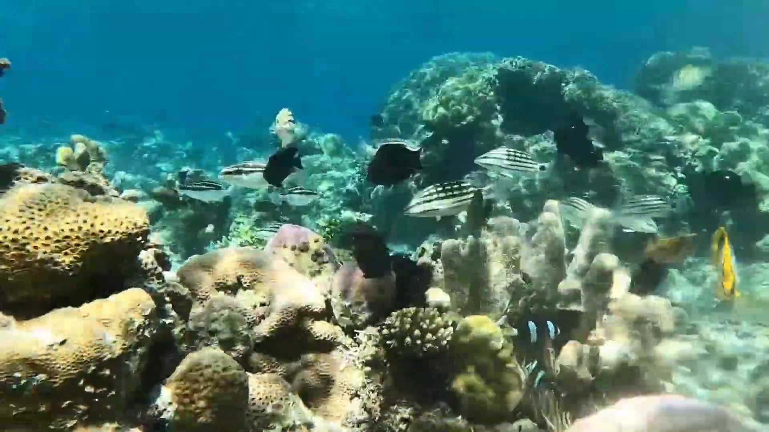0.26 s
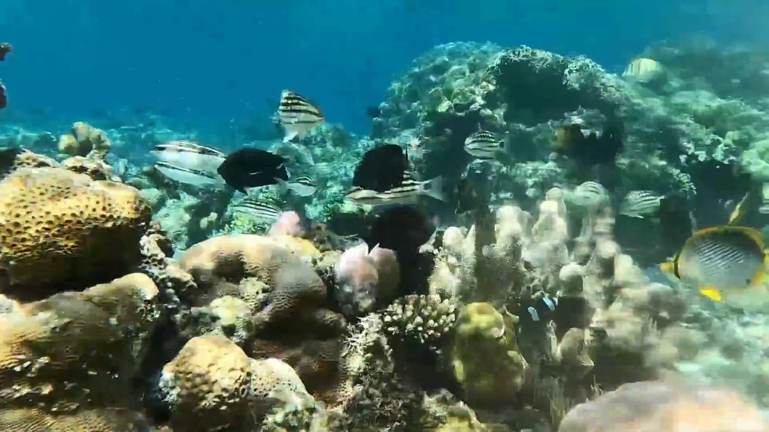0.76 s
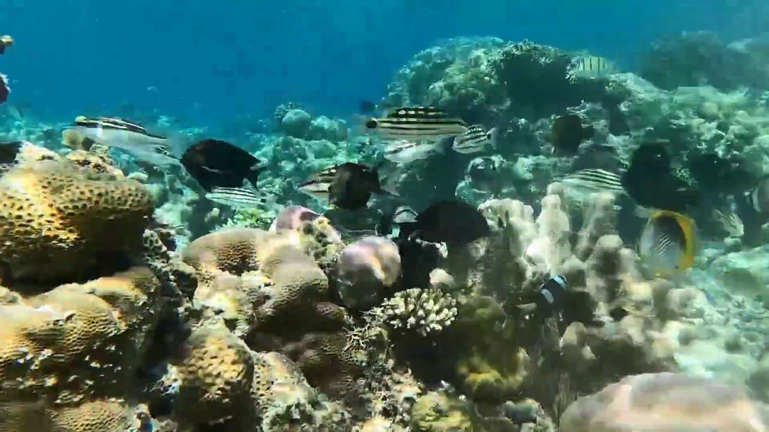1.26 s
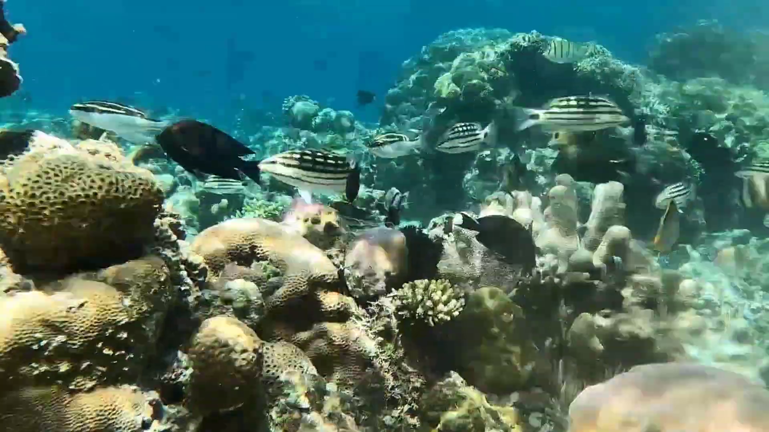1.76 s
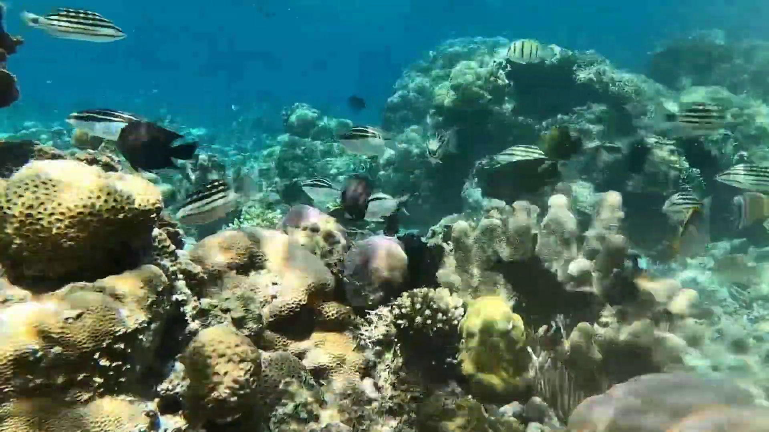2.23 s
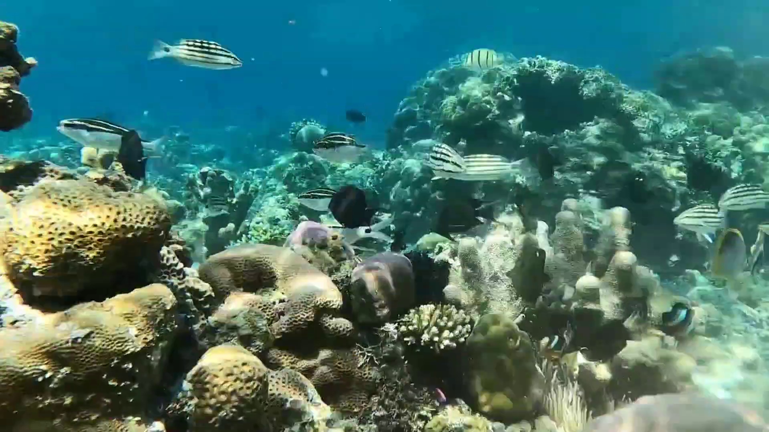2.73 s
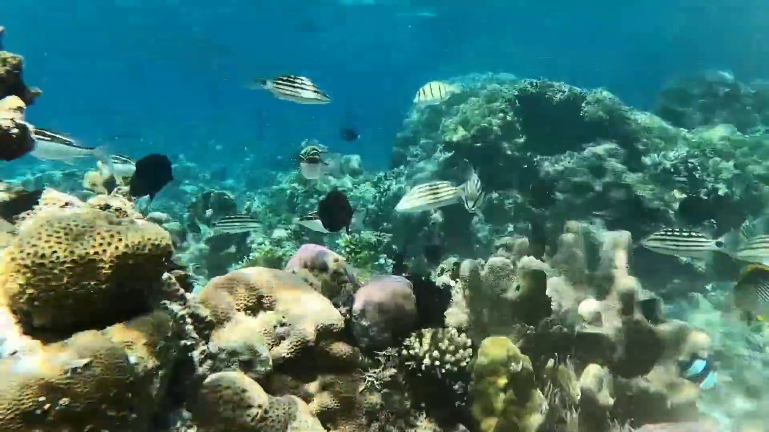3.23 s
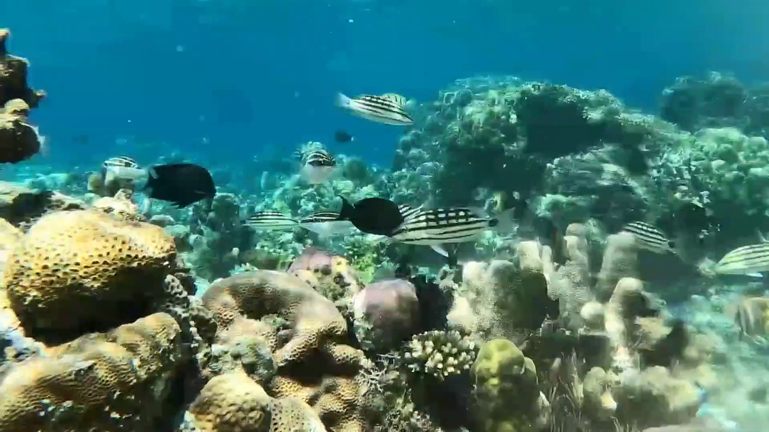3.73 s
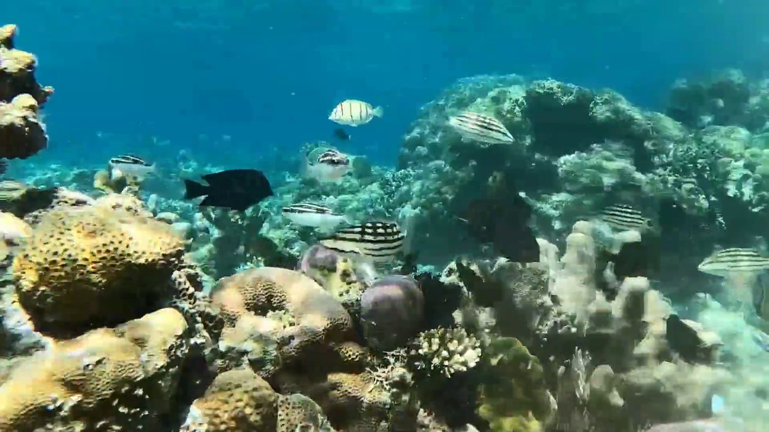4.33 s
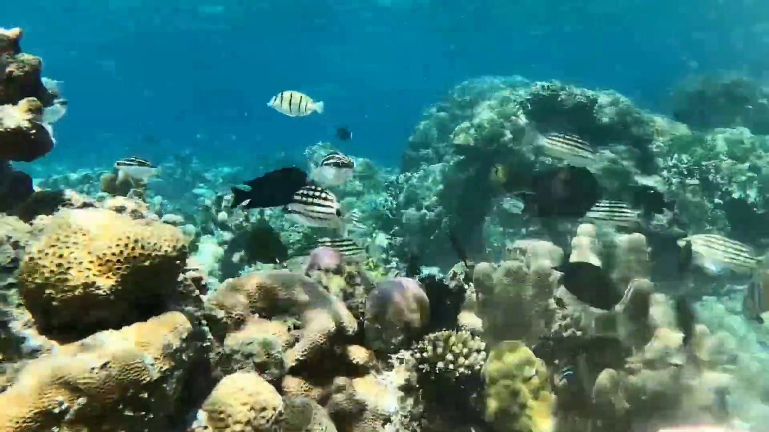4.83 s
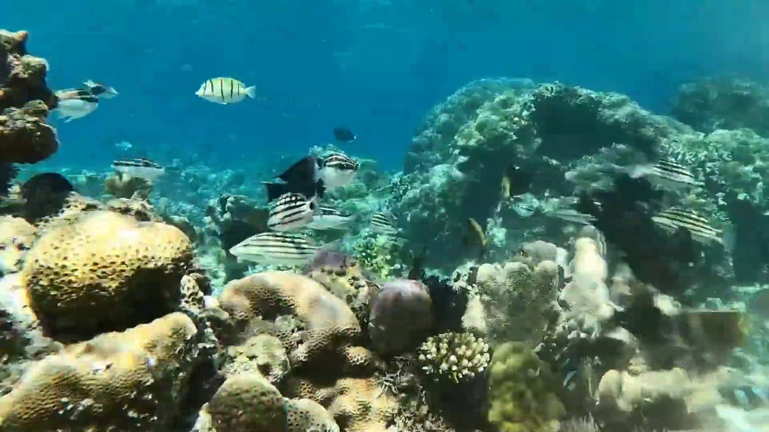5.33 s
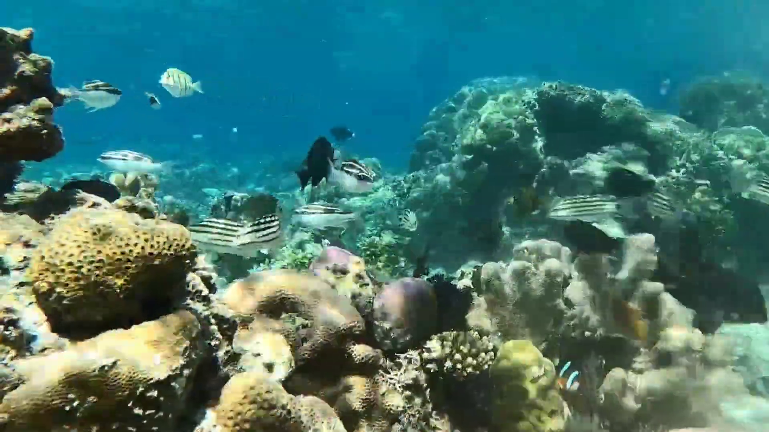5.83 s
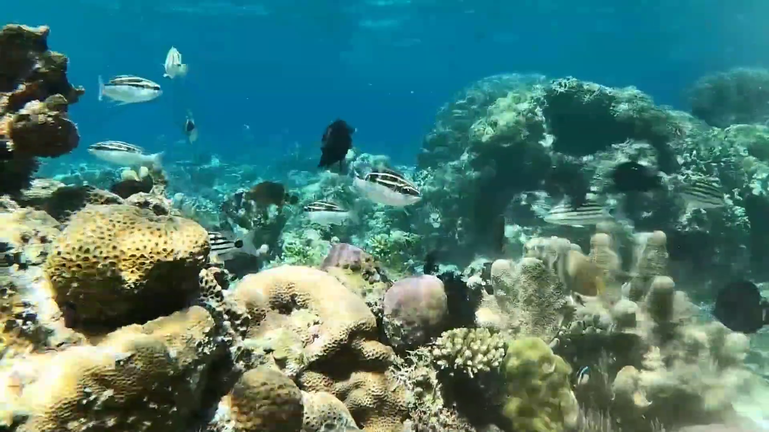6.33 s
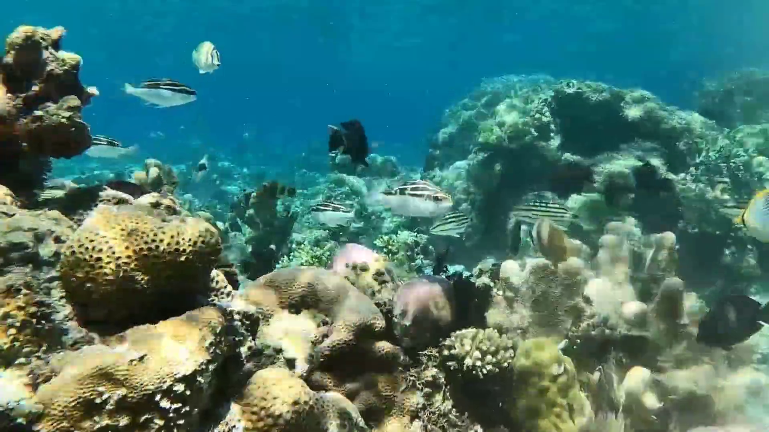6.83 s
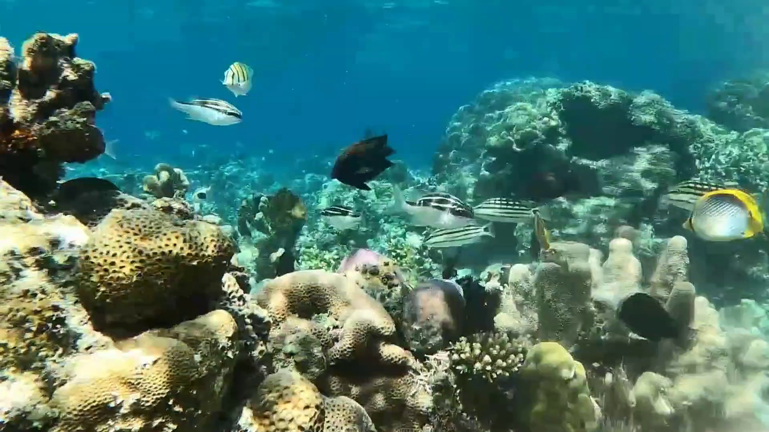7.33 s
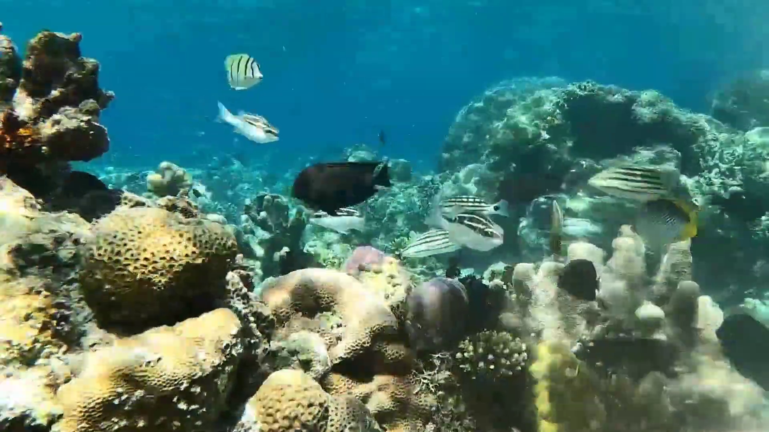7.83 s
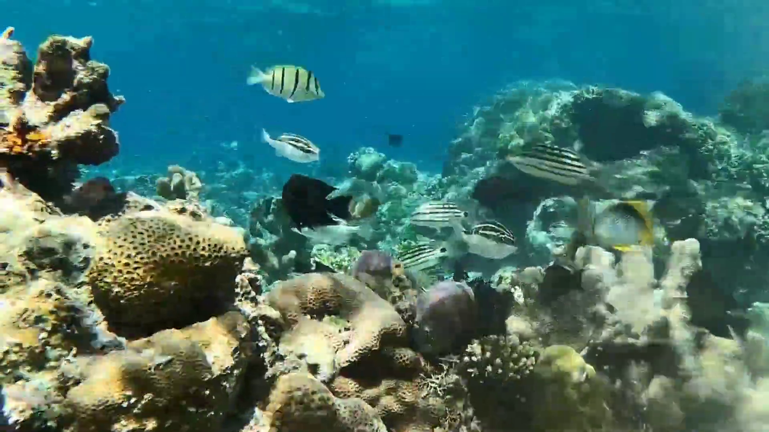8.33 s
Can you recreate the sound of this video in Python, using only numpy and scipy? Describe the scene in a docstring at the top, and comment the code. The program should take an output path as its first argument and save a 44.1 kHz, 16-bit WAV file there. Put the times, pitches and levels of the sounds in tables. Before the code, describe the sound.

A close, muffled underwater soundscape on a coral reef, heard in stereo through a sealed camera housing. From the start, distant snapping shrimp form a continuous fine fizz like frying, while nearer ones make irregular dry clicks and pops that ring the housing briefly; a strong snap comes near 0.5 s. Soft, low fish knocks appear here and there throughout. Around 0.9-1.4 s the housing is lightly bumped and rubbed as the water rumble rises. Loud snaps hit near 2.0-2.3 s, then a heavier surge with dull thuds and grainy rubbing runs from 2.4 to 3.1 s, followed by scattered bumps until 3.9 s. A loud pop lands at 4.6 s. From 5 to 6.7 s it is calmer, with crackle, low rumble and isolated knocks. Snaps thicken after 6.7 s, strong at 7.4 and 8.1 s, with a brief buffet near 7.55 s. Bumps, rubbing and a surge swell at 8.4-8.6 s. Faint hiss lies beneath.

```python
"""Snapping shrimp crackle near and far over a coral reef, around a camera in a sealed housing.
Their clicks are noise and impulses that ring the housing's modes; fish knock softly with sagging tones.
The surge rumbles and buffets as coloured noise, and bumps and rubbing ring the housing wall.
A faint microphone hiss lies underneath."""
import sys
import numpy as np
from scipy import signal
from scipy.fft import rfft, irfft, next_fast_len
from scipy.io import wavfile
from scipy.ndimage import uniform_filter1d

SR = 44100
rng = np.random.default_rng(int(sys.argv[2]) if len(sys.argv) > 2 else 0)


def wrap_up_sound(samples):
    """Save the sound to the file named by the first command line argument, as 16-bit audio."""
    columns = np.atleast_2d(samples).T
    # keep every value between -1 and 1, then stretch to whole-number steps
    tamed = np.clip(columns, -1, 1)
    steps = np.round(tamed * 32767).astype(np.int16)
    wavfile.write(sys.argv[1], SR, steps)


N = 378378


def gain_of(db):
    """Decibels to amplitude."""
    return 10 ** (np.asarray(db) / 20)


def evened(x):
    """Scales to rms 1."""
    return x / np.sqrt(np.mean(abs(x) ** 2) + 1e-20)


def curve(rows, **ends):
    """A level table against time, at every sample."""
    return np.interp(np.arange(N) / SR, *np.transpose(rows), **ends)


def lumps(seconds):
    """Slow random wander of rms 1: noise averaged twice over the given time."""
    size = max(int(seconds * SR), 2)
    once = uniform_filter1d(rng.standard_normal(N), size)
    return evened(uniform_filter1d(once, size))


def alike(a, b, same):
    """Blends two independent noises so that the result resembles the first by the given likeness."""
    return same * a + np.sqrt(1 - same ** 2) * b


def coloured(spectrum, likeness):
    """Two channels of noise with a given spectrum and left-right likeness, rms 1."""
    size = next_fast_len(N)
    pitch = np.log(np.fft.rfftfreq(size, 1 / SR) + 1)
    hz, db = np.transpose(spectrum)
    same_hz, same = np.transpose(likeness)
    same = np.clip(np.interp(pitch, np.log(same_hz + 1), same), 0, 1)
    shape = gain_of(np.interp(pitch, np.log(hz + 1), db, left=-90, right=-90))
    left, other = rfft(rng.standard_normal((2, size))) * shape
    return evened(irfft([left, alike(left, other, same)], size)[:, :N])


def ring(x, hz, width):
    """Three like poles in a row: a click swells for a moment, then dies; unit energy, complex out."""
    r = np.exp(-np.pi * width / np.sqrt(np.cbrt(2) - 1) / SR)
    pole = r * np.exp(2j * np.pi * hz / SR)
    energy = (1 + 4 * r ** 2 + r ** 4) / (1 - r ** 2) ** 5
    return signal.lfilter([1], np.poly([pole, pole, pole]), x) / np.sqrt(energy)


def add(mix, s, sound):
    """Mixes a sound in at a time in seconds."""
    part = mix[max(round(s * SR), 0):][:len(sound)]
    part += sound[:len(part)]


# Near shrimp. Each row: snap time in seconds, relative strength in dB, centre pitch in Hz, # change away from
# that pitch in dB per octave.
SNAPS = [(0.142, -29, 1490, 2), (0.2097, -21, 2960, -8), (0.2283, -19, 3590, -2.5),
         (0.2405, -14, 7150, -18), (0.3217, -24, 3260, -5), (0.3533, -22, 6450, -4.5),
         (0.3783, -16.5, 1490, -9), (0.4031, -22, 6450, -8), (0.4458, -20, 1490, 0.5),
         (0.4887, 3.5, 5100, -3), (0.5011, -32, 4380, -5), (0.5622, -14.0, 7700, -21.0),
         (0.584, -26, 3420, -10), (0.6541, -19, 10000, -4.5), (0.7489, -13.5, 1930, -11),
         (0.8993, -6, 2220, -1.0), (0.9256, -8, 2550, -27), (0.9462, -16, 1490, -5.5),
         (0.9735, -23.5, 6400, -6), (1.0119, -25, 2820, 1.5), (1.028, -22, 6400, -11),
         (1.0568, -23, 10000, -2), (1.1566, -25, 3420, -2), (1.501, -21.5, 6770, -6.0),
         (1.5193, -19.5, 2820, -4.5), (1.5443, -10.5, 5800, -6.5), (1.6306, -3.5, 2760, -14.5),
         (1.715, -3.5, 2365, -42), (1.7781, -14, 2040, -10.5), (1.8313, -8, 10000, -9),
         (1.8727, -19, 10000, -4), (1.888, -10, 6470, -5), (2.0291, 0.5, 8930, -1.5),
         (2.0426, -28, 1650, -4.0), (2.1572, -17.5, 6400, -4.5), (2.168, -8, 7460, -3.5),
         (2.2083, -13.5, 1490, -7.5), (2.2292, 7, 1490, -38), (2.244, -25, 10000, -2),
         (2.2619, 2, 9070, -16.0), (2.3971, -14, 1490, -9.0), (2.4107, -25.5, 10000, 1),
         (2.5114, -17, 1490, -25.0), (2.5245, -18.5, 1570, -29.0), (2.5422, -19, 1570, -26.0),
         (2.5818, -17.5, 8640, -8), (2.6335, -27.5, 1650, -3), (2.6894, -22, 1490, -5),
         (2.8152, -19, 4370, -7), (2.8451, -16, 2820, -4), (2.8854, -18.5, 1490, -13),
         (2.8977, -20, 1490, -11), (2.9383, -24.5, 1490, -9), (2.9631, -10, 3280, -9),
         (3.1316, -11.5, 1880, -17), (3.2625, -6.5, 7550, -29), (3.3702, -12, 9070, -10),
         (3.4462, -17.5, 1490, -4), (3.4973, -12, 10040, -6.5), (3.5215, -14, 1708, -5.5),
         (3.6066, -8, 10000, -16), (3.619, -14.5, 10000, -1.5), (3.6855, -15.5, 9080, -8),
         (3.742, -12, 4030, -11), (3.9082, -25, 1493, -27), (3.9337, -16, 1720, -22),
         (4.0019, -15.0, 7460, -5.5), (4.017, -17, 5050, -10), (4.0315, -15.5, 2210, -5),
         (4.042, -11.5, 3520, -21), (4.08, -23.5, 1740, 1), (4.104, -16.5, 1490, -2.0),
         (4.1235, -23.0, 2670, -12), (4.1787, -5.5, 3480, -13.5), (4.271, -19.5, 9000, -11),
         (4.3307, -12.5, 7400, -17), (4.3799, -9, 7370, -4.0), (4.4513, -6.5, 9700, -13),
         (4.485, -8.0, 7110, -9.5), (4.4965, -10.5, 6132, -9.5), (4.5546, -25.5, 2960, -7),
         (4.569, -22, 5050, -5), (4.5803, 4.5, 1560, -10.5), (4.6843, -16, 1730, -6.5),
         (4.749, -19, 7050, -8.0), (4.7923, -15, 2210, -12), (4.875, -22.5, 6400, -5),
         (4.893, -20, 6800, -12), (4.939, -14.5, 1490, -8), (4.9934, -9, 8100, -14),
         (5.003, -24, 6780, -2.5), (5.0225, -18, 5310, -4), (5.1313, -15.5, 8640, -7.5),
         (5.1745, -25, 8640, -4.5), (5.1882, -19, 4810, -10), (5.2913, -21, 1820, -7.5),
         (5.3299, -13.5, 4640, -14), (5.3947, -17.5, 1490, -0.5), (5.58, -20, 7460, -7.5),
         (5.6309, -16, 3590, -2.5), (5.7114, -12.5, 2960, -6), (5.812, -17, 1490, -26),
         (5.8766, -18, 8230, -12), (5.953, -29.5, 10000, 2.5), (6.0304, -14, 10000, -2),
         (6.0439, -17, 1490, -3.5), (6.1476, -16, 7200, -8.5), (6.21, -20, 1649, -9),
         (6.315, -23, 10000, -2.0), (6.3949, -11, 2550, -31), (6.6618, -24, 1495, -0.0),
         (6.7018, -16, 4810, -5.5), (6.7565, -13.5, 6500, -11), (6.767, -4.5, 3210, -5),
         (6.7784, -24, 1729, -6), (6.8202, -18.5, 5310, -7), (6.8407, -22.5, 2210, -5),
         (6.9946, -13.5, 2000, -9.5), (7.0298, -6, 1820, -10), (7.0426, -16, 1490, -9),
         (7.0533, -17, 10000, -5.5), (7.0716, -17, 1570, -20.0), (7.1165, -18, 2430, -22),
         (7.134, -18, 3260, -4.5), (7.1614, -22.5, 1730, -2.5), (7.215, -18, 5500, -7),
         (7.2205, -11.0, 10000, -5), (7.2385, -3, 2470, -32), (7.283, -21, 2210, -5.5),
         (7.321, -23, 2960, -2), (7.3482, -18, 3980, -5.5), (7.413, 0.5, 9070, -9),
         (7.4354, -9.5, 7460, -9), (7.4481, -14, 1500, -4), (7.4765, -23, 2960, -4),
         (7.5189, -18.0, 7460, -5.5), (7.5904, -24.5, 6450, -4), (7.6468, -8.5, 3103, -11),
         (7.6628, -18.5, 3260, -12), (7.7742, -13, 9520, -10), (7.7977, -18, 7840, -5.5),
         (7.851, -15, 1560, -32), (7.8682, -16.0, 10000, -6.5), (7.946, -19.5, 1730, -8.0),
         (7.9665, -16.5, 9070, -9.5), (7.984, -14.5, 10000, -12), (8.0077, -18.5, 7460, -6.5),
         (8.0346, -9.5, 1730, -4), (8.0723, -9.5, 9520, -6.0), (8.1363, 6.0, 9520, -10.0),
         (8.1523, -19.0, 2430, -22.0), (8.2132, -27, 9070, 0.5), (8.3005, -19, 3830, -13),
         (8.364, -18.5, 4160, -6), (8.4161, -5, 7800, -26), (8.434, -19, 7997, -10),
         (8.4472, -6.5, 4584, -7.5), (8.5075, -4, 1560, -29.0), (8.5328, -25, 1490, 1)]
# Typical colour of near shrimp: one relative level in dB for each of the four snap bands.
NEAR_DB = [-7.5, -3.5, -4.6, -16.5]
SKIRT_DB = -23.5  # far from its pitch a snap falls no lower than this


def near_snaps(heard_hz, bands, bounce):
    """Near-shrimp impulses, one train per given frequency; each snap has its own pitch and surface echo."""
    s, db, hz, fall_db = np.transpose(SNAPS)
    octaves_away = abs(np.log2(np.c_[heard_hz] / hz))
    tint_db = np.maximum(fall_db * octaves_away, SKIRT_DB)
    size = gain_of(db + np.c_[NEAR_DB][bands] + tint_db)
    # each snap returns once off the water surface, 0.9 to 3.5 ms later and 12 to 4 dB softer
    late_s = np.interp(bounce[0], [0, 1], (.0009, .0035))
    late_db = np.interp(bounce[1], [0, 1], (-12, -4))
    trains = np.zeros((len(bands), N))
    trains[:, np.round((s + late_s) * SR).astype(int)] = size * gain_of(late_db)
    trains[:, np.round(s * SR).astype(int)] = size
    return trains


# Typical colour of small shrimp: one relative level in dB for each of the four snap bands.
SMALL_DB = [-6.5, -2.5, -0.5, -7]


def crackle(per_s=190, level_db=-51, spread_db=5, cap=2.57, colour_db=6):
    """Many smaller shrimp: random moments, few large, each with its own colour."""
    size_db = level_db + spread_db * np.minimum(rng.exponential(1, N), cap)
    tint_db = np.array(SMALL_DB)[:, None] + colour_db * rng.standard_normal((4, N))
    snaps_now = rng.random(N) < per_s / SR
    return snaps_now * gain_of(size_db + tint_db)


def scatter(trains, t60, rise):
    """Envelope of the echoes from coral and surface: they gather for a moment, then fade."""
    fall = gain_of(-120 / t60 / SR)  # acts on power: 60 dB down after t60 seconds
    grow = np.exp(-1 / (max(rise, 1e-4) * SR))
    power = signal.lfilter([1 - grow], np.poly([fall, grow]), trains ** 2)
    return np.sqrt(abs(power))


# Far shrimp merged into a fizz. Each row: time in seconds, relative level in dB.
FIZZ = [(0.0, -64.5), (0.14, -57), (0.33, -57), (0.62, -59.5), (2.34, -57.5), (2.75, -56.5), (3.13, -59.5),
        (4.8, -57), (5.07, -58), (7.05, -58), (7.24, -56.5), (7.55, -58.5), (8.46, -57.5), (8.58, -56.5)]
# Typical colour of far shrimp: one relative level in dB for each of the four snap bands.
FAR_DB = [-7, -5, -3, -20]


def fizz():
    """Level of the merged far snaps in each band, flickering together and band by band."""
    own_flicker = np.array([lumps(0.0068) for _ in FAR_DB])
    return gain_of(curve(FIZZ) + np.array(FAR_DB)[:, None] + 1.88 * lumps(0.016) + 2.4 * own_flicker)


# Housing modes. Each row: pitch in Hz, width in Hz, relative level in dB within its snap band.
HOUSING = [(1260, 360, -19), (1488, 163, -2), (1710, 212, 1), (2233, 293, -7.5), (2960, 630, -1),
           (3640, 600, -5), (4540, 690, -5), (5146, 820, -1), (6383, 630, 0.5), (7606, 540, -9.5),
           (8885, 580, -12.5), (9760, 460, -18), (11270, 1200, -26), (12140, 1500, -26), (14400, 800, -36)]
# How each mode reaches the two microphone ports. Each row: left minus right in dB,
# left phase lead in radians, left-right likeness from 0 to 1.
PORTS = [(0, -1.5, .3), (3.5, -.3, 1), (4.5, -.1, 1), (4, -.9, 1), (6, -.9, 1), (-3, -2.6, 1),
         (-6, -.3, .8), (-4, .1, 1), (-.7, 0, 1), (-1, 0, 1), (3, -.1, 1), (1, -.15, 1), (1.5, .1, 1),
         (-1, .2, .55), (.5, -.6, .5)]
# Borders of the four snap bands, in Hz.
BAND_TOPS = [2000, 4000, 7300]
# Middles of the four snap bands, in Hz.
BAND_MIDS = [1600, 2900, 5600, 9000]
DIRECT = .8  # amplitude share of a small click that arrives unscattered


def shrimp(rub, near_echo_db=-21, small_echo_db=-22, mode_spread_db=2, rub_db=-1):
    """Clicks, their scatter, the fizz and the rubbing all reach the microphones through the housing modes."""
    bounce = rng.random((len(SNAPS), 2)).T
    near = near_snaps(BAND_MIDS, np.arange(len(BAND_MIDS)), bounce)
    # the claw shuts and the bubble grows 3 ms before it collapses
    small = crackle() + gain_of(-32.5) * np.roll(near, -round(.003 * SR), axis=1)
    near_echo = gain_of(near_echo_db) * scatter(near, 0.021, 0.00026)
    small_echo = gain_of(small_echo_db) * scatter(small, 0.013, 0.00054)
    drive = np.hypot(near_echo + small_echo, fizz())
    drive[0] = np.hypot(drive[0], rub * gain_of(rub_db))  # rubbing enters the lowest band only
    modes = np.array(HOUSING)
    bands = np.searchsorted(BAND_TOPS, modes[:, 0])
    clicks = near_snaps(modes[:, 0], bands, bounce) + DIRECT * small[bands]
    at = np.flatnonzero(clicks[0])
    power = gain_of(2 * modes[:, 2]) * modes[:, 1]
    out = np.zeros((2, N))
    for (hz, width, _), port_row, band, own, click in zip(HOUSING, PORTS, bands, power, clicks):
        balance_db, lead, same = port_row
        # the direction of arrival sets how hard and in which phase a click starts each mode
        push = np.zeros((1 if same == 1 else 2, N), complex)
        push[:, at] = click[at] * np.exp(2j * np.pi * rng.random((len(push), len(at))))
        push[:, at] *= gain_of(mode_spread_db * rng.standard_normal(len(at)))
        rung = ring(push + drive[band] * rng.standard_normal(push.shape), hz, width)
        pair = [rung[0], alike(rung[0], rung[-1], same)]
        balance = gain_of([[balance_db / 2], [-balance_db / 2]])
        port = balance * np.exp(1j * np.array([[lead], [-lead]]) / 2)
        share = own / power[bands == band].sum()
        out += np.sqrt(share) * (port * pair).real
    return out


def far_knocks(count=60, level_db=-55, spread_db=3.5, low_hz=190, high_hz=380, cycles=3.1):
    """Faint fish further off: rows like those of the near fish, at random moments."""
    when, size, pitch = rng.random((count, 3)).T
    db = level_db - spread_db * np.log(size + .15)
    return np.c_[when * (N / SR), db, low_hz + (high_hz - low_hz) * pitch, cycles + 0 * when]


# Fish drumming on the swim bladder. Each row: start in seconds, nominal peak in dB,
# nominal pitch in Hz, nominal length in cycles.
KNOCKS = [(0.107, -36, 267, 4.6), (0.224, -35.5, 246, 2.5), (0.328, -44, 288, 6.3), (0.35, -44.5, 293, 6.7),
          (0.381, -34.5, 268, 3.4), (0.542, -43, 363, 3.8), (1.015, -41, 292, 2.4), (1.066, -47, 380, 4.6),
          (1.129, -39.5, 319, 11.2), (1.158, -35, 243.7, 2), (1.251, -47, 227, 4.8),
          (1.298, -39.5, 212, 2.8), (1.373, -30, 183, 3), (1.945, -32.5, 257, 2.7),
          (2.191, -49, 190.7, 2.8), (3.219, -33.5, 261, 2.3), (3.479, -32, 256.2, 2.8),
          (3.71, -39.5, 279, 2.6), (3.816, -45.5, 223.5, 6.6), (3.858, -48, 162, 3.6),
          (4.197, -42.5, 277.8, 4.6), (4.31, -44, 300, 2.9), (4.448, -31, 262, 2.7), (4.562, -44, 234, 2.4),
          (5.471, -34.5, 268, 2.8), (5.629, -30.5, 260, 2.44), (6.284, -30.5, 265, 2.7),
          (6.367, -40, 269, 3.8), (6.738, -38.5, 217.6, 4.3), (6.784, -28, 256.1, 2.8),
          (7.127, -32.5, 257, 2.6), (7.402, -32, 260.9, 2.8), (7.91, -44, 200, 6.6),
          (8.024, -46.5, 212, 6.3), (8.432, -35, 222.1, 1.5)]


def fish(rise=0.4, start=1.138, droop=0.13, overtone=0.12):
    """A muscle twitch swells the bladder tone quickly; the pitch sags as it dies."""
    out = np.zeros(N)
    for s, db, hz, cycles in [*KNOCKS, *far_knocks()]:
        u = np.arange(0, 2 * cycles / hz, 1 / SR) * hz / cycles  # time in nominal lengths
        swell = (u / rise) ** 2 * np.exp(2 - 2 * u / rise)
        phase = 2 * np.pi * (cycles * u * (start - droop * u) + rng.random())
        tone = np.sin(phase) + overtone * swell * np.sin(1.57 * phase)
        add(out, s, gain_of(db) * swell * tone)
    return out * gain_of([[-.2], [.2]])


# Something rubs along the housing: one table a stroke. Each row: time in seconds, relative level in dB.
RUBS = [
    [(0.88, -65), (0.94, -62), (1.35, -100)],
    [(2.36, -59.5), (2.466, -57.5), (2.732, -64), (2.82, -57.5), (2.9, -54), (2.944, -63), (3.0, -90)],
    [(8.39, -68), (8.58, -58.5)],
]


def rubbing():
    """Grainy friction level: the strokes, roughened by stick and slip."""
    strokes = sum(gain_of(curve(rows, left=-120, right=-120)) for rows in RUBS)
    return strokes * gain_of(1.9 * lumps(0.0046) + 5.76 * lumps(0.036))


# The housing is bumped. Each row: start in seconds, relative knock level in dB,
# cycle of the push in milliseconds, relative push level in dB.
BUMPS = [(0.89, -60, 8.4, -26), (0.926, -41.5, 13, -30), (0.962, -46, 8.8, -36), (1.043, -46, 9.2, -36),
         (1.191, -41, 10, -26), (1.389, -38, 13.6, -20), (2.366, -50, 7.4, -33), (2.389, -34.5, 7.8, -26),
         (2.406, -36.5, 13.4, -17.5), (2.445, -37, 12.3, -22), (2.486, -50, 17, -24),
         (2.506, -33.5, 17.5, -14), (2.596, -38.5, 13, -21), (2.631, -37.5, 13.7, -22),
         (2.679, -38.5, 12.8, -22), (2.718, -50, 23, -28), (2.799, -37, 11.2, -17.5),
         (2.854, -37.5, 14, -28), (2.893, -41, 11, -25.5), (2.948, -54, 12.4, -39), (2.965, -35, 13.2, -22),
         (2.984, -40, 8.6, -18.5), (3.039, -41.5, 13, -27), (3.07, -40, 14.6, -26.5),
         (3.141, -33, 7.8, -25), (3.326, -35, 9.5, -25.5), (3.341, -49, 11.9, -34), (3.367, -36, 6.9, -29),
         (3.459, -38.5, 11, -35), (3.657, -48, 13.7, -27.5), (3.907, -28, 7.8, -20),
         (3.935, -41.5, 11.2, -33), (5.496, -39, 12, -50), (5.584, -43.5, 22.6, -24), (8.419, -43, 11, -34),
         (8.483, -38.5, 14.8, -24), (8.506, -33.5, 11.4, -25), (8.56, -57, 16, -31)]
# Broad low modes of the wall. Each row: pitch in Hz, width in Hz, relative level in dB.
WALL = [(294, 166, 0), (442, 140, -6.5), (738, 740, -14), (1126, 270, -15), (1450, 270, -19.5)]


def bumps(rub, damping=1.72, knock_db=27, scrape_db=-7, rub_db=8):
    """Each bump is a damped push plus a knock and a short scrape; knock, scrape and rubbing ring the wall."""
    t = np.arange(0, .08, 1 / SR)
    push, knock, scrape = np.zeros((3, N))
    for s, db, ms, push_db in BUMPS:
        u = t * 1000 / ms  # time in cycles
        swing = np.sin(2 * np.pi * u) * np.exp(-damping * u) * (1 - np.exp(-5 * u))
        side = rng.choice([-1, 1])  # inward or outward
        add(push, s, side * gain_of(push_db) * swing)
        add(knock, s + ms / 4000, side * gain_of([db + knock_db]))  # a quarter cycle into the push
        add(scrape, s, gain_of(db + scrape_db) * np.exp(-t / 0.014))
    rough = np.hypot(scrape, gain_of(rub_db) * rub)
    out = push * gain_of([[-.3], [.3]])
    for hz, width, db in WALL:
        same = np.clip(np.interp(hz, *np.transpose(EDDY_SAME)), 0, 1)  # as alike as the eddies
        left, other = rough * rng.standard_normal((2, N))
        drive = knock + np.array([left, alike(left, other, same)])
        out += gain_of([[db - 5.0], [db - 2.6]]) * ring(drive, hz, width).imag
    return out


# Moving water. Each row: time in seconds, relative rumble level in dB, relative eddy level in dB.
WATER = [(0.0, -39.5, -64.5), (0.93, -39.5, -59), (1.1, -35.5, -55.5), (1.77, -40, -63.5), (2.36, -37, -58),
         (2.53, -31.5, -51.5), (2.84, -32, -53.5), (3.32, -36.5, -60.5), (5.26, -39, -63.5),
         (5.78, -40.5, -62), (7.38, -40, -59.5), (7.5, -44.5, -63), (7.55, -35, -57.5), (7.77, -43, -70.5),
         (7.96, -39.5, -60.5), (8.46, -38.5, -68), (8.53, -31, -49), (8.58, -44, -65)]
# Rumble spectrum. Each row: pitch in Hz, relative level in dB per Hz.
RUMBLE = [(7.1, -16), (12, -0.5), (29, -5), (36, -21), (43, -11), (75, -29), (105, -67), (130, -76),
          (170, -85), (290, -120)]
# Rumble width. Each row: pitch in Hz, left-right likeness from 0 to 1.
RUMBLE_SAME = [(30, 0.994)]
# Spectrum of the buffeting eddies. Each row: pitch in Hz, relative level in dB per Hz.
BUFFET = [(41, -41), (70, -11.5), (205, -9), (244, -9), (433, -21.5), (552, -30.5), (697, -42.5),
          (935, -42), (1300, -28.5), (1690, -32), (2860, -120)]
# Eddy width. Each row: pitch in Hz, left-right likeness from 0 to 1.
EDDY_SAME = [(60, 0.96), (250, 0.76), (500, 0.55), (800, 0.05)]


def surge():
    """Slow pressure swings that come and go, and lumpy eddies."""
    s, rumble_db, eddy_db = np.transpose(WATER)
    rumble_level = gain_of(curve(np.c_[s, rumble_db]) + 1.3 * lumps(0.07))
    eddy_level = gain_of(curve(np.c_[s, eddy_db]) + 2.07 * lumps(0.0095) + 3.34 * lumps(0.071))
    rumble = coloured(RUMBLE, RUMBLE_SAME) * rumble_level
    buffet = coloured(BUFFET, EDDY_SAME) * eddy_level
    return rumble * gain_of([[-.2], [.2]]) + buffet * gain_of([[-.8], [.8]])


# Microphone noise spectrum. Each row: pitch in Hz, relative level in dB per Hz.
HISS = [(300, -1.5), (700, 2), (2000, -5), (9000, -5), (15000, -25)]


def microphone_hiss():
    """Steady microphone noise, nearly independent left and right."""
    return gain_of(-73.5) * coloured(HISS, [(1000, 0.09)])


def scene():
    """All sources at the two microphone ports."""
    rub = rubbing()  # the same friction drives housing modes and wall
    return shrimp(rub) + fish() + bumps(rub) + surge() + microphone_hiss()


def record(dry, edge_hz=15900):
    """The band limit: a steep low-pass."""
    lowpass = signal.firwin(511, edge_hz, window=("kaiser", 9), fs=SR)
    return signal.oaconvolve(dry, lowpass[None], "same")


dry = scene()
out = record(dry)
wrap_up_sound(out)
```